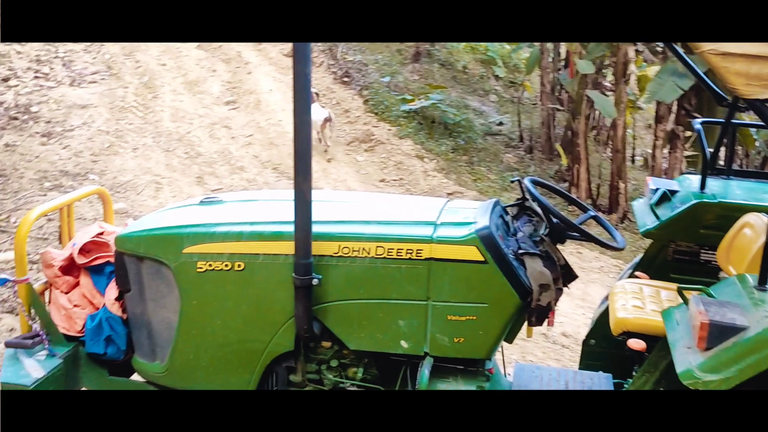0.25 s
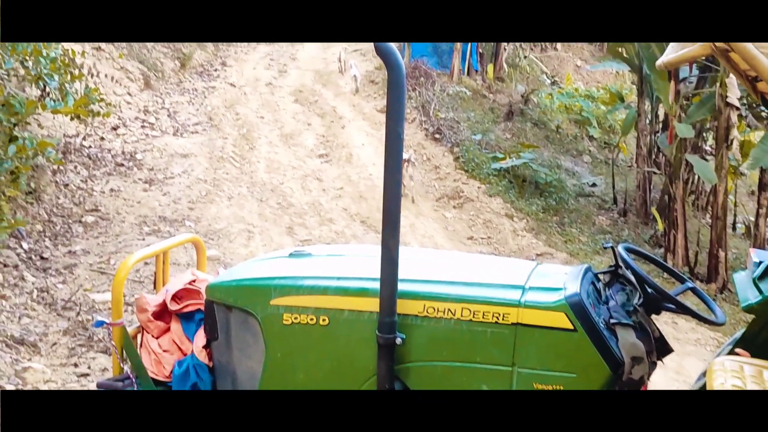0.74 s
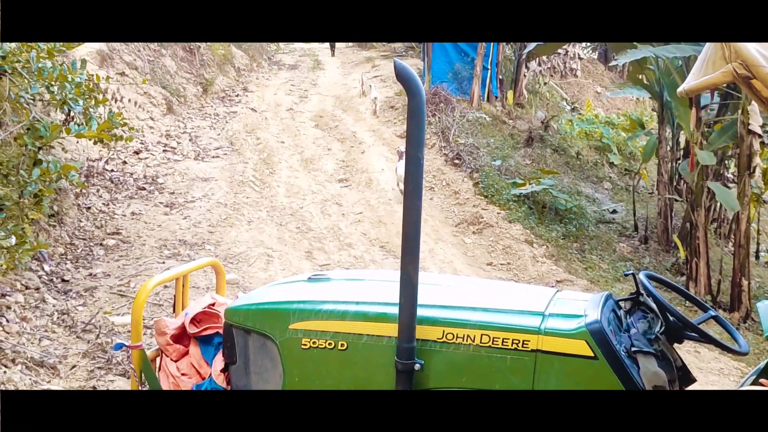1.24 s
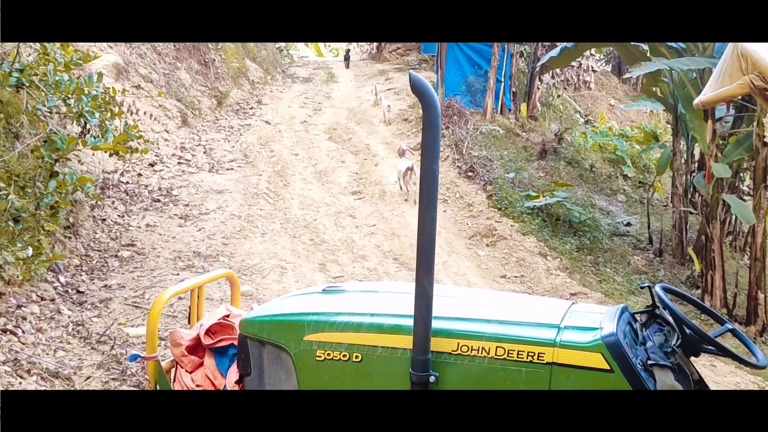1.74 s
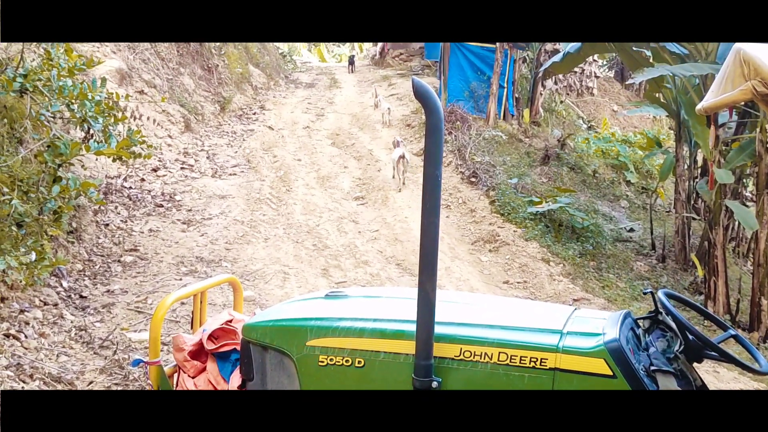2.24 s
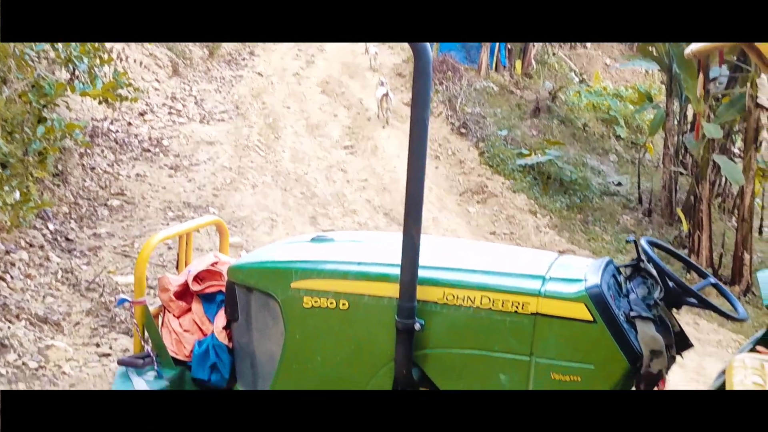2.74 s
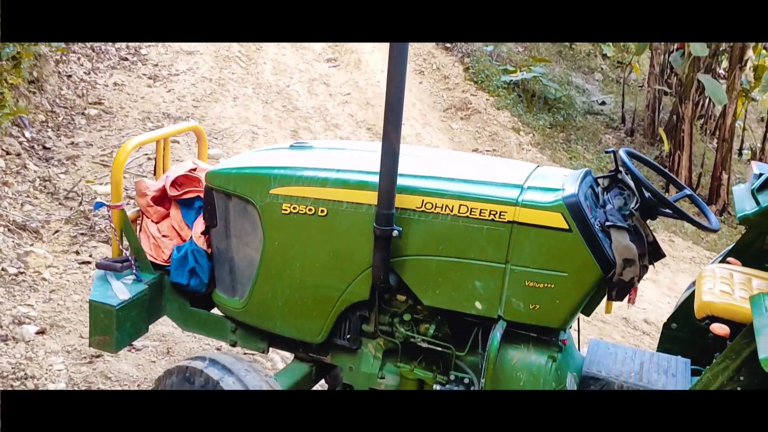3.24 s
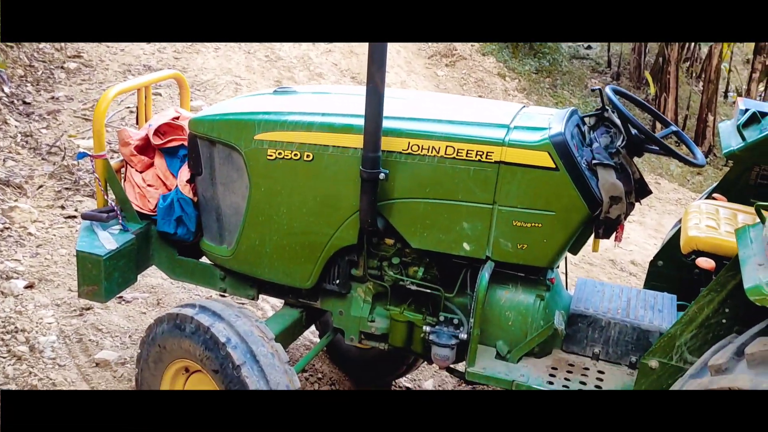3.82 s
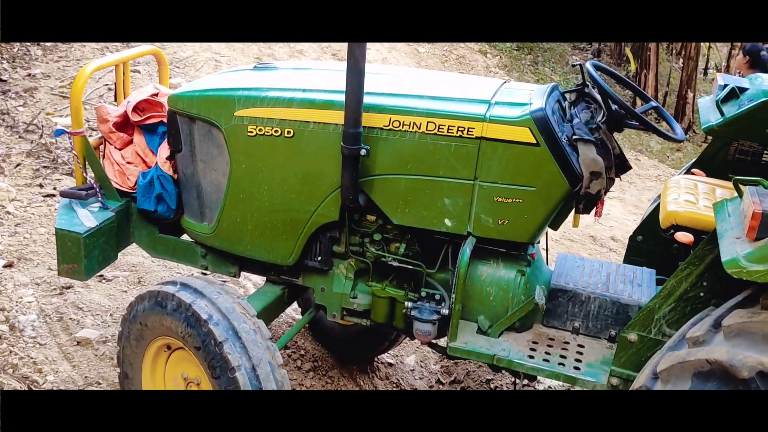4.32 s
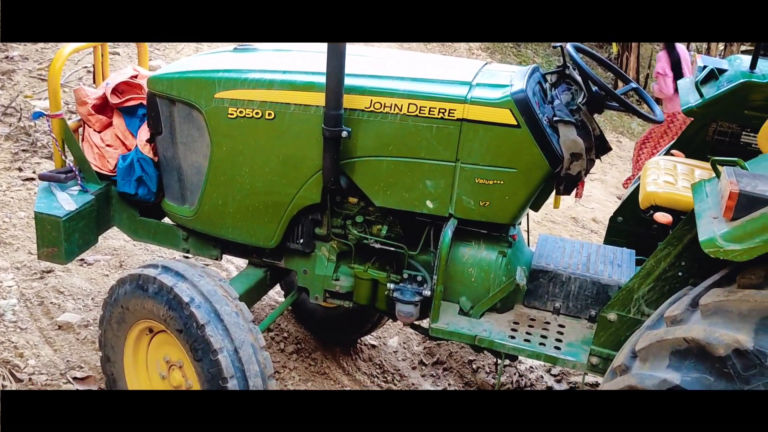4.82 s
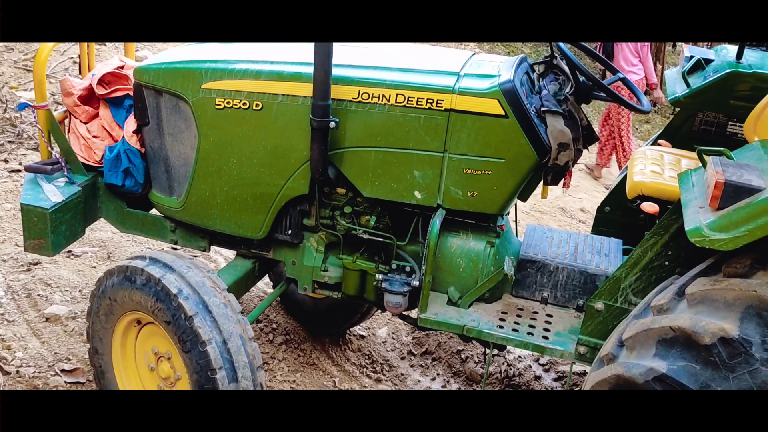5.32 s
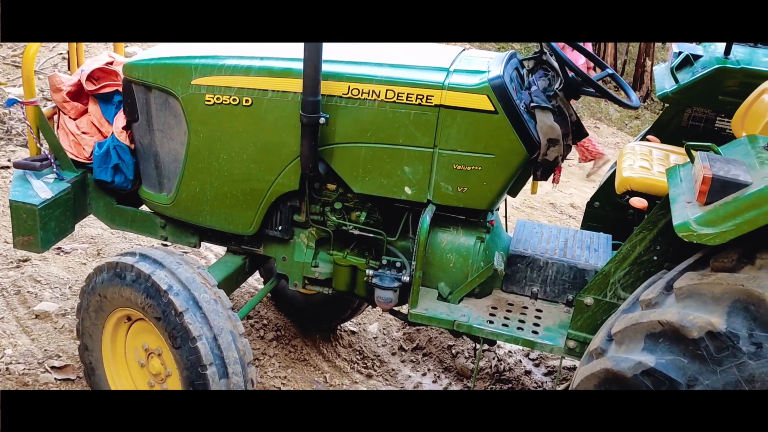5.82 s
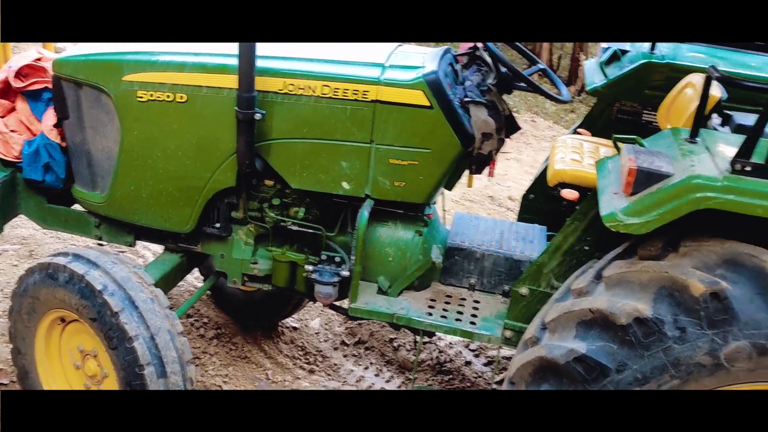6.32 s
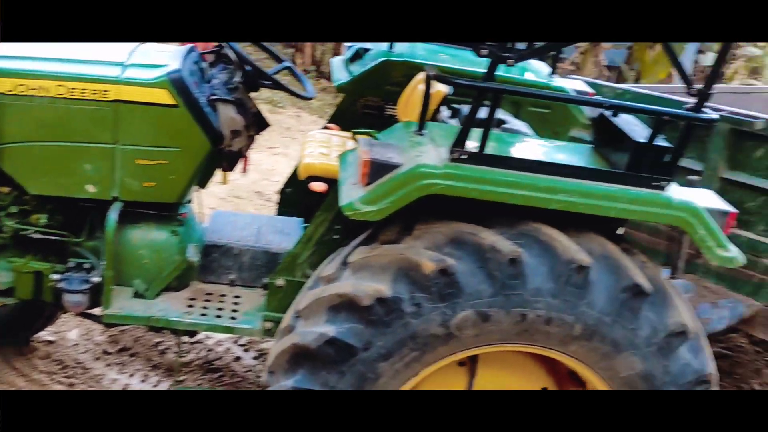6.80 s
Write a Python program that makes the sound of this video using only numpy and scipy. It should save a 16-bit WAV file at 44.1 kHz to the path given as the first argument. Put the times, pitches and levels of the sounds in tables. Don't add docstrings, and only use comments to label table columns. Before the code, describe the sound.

Dry outdoor stereo sound beside a dirt track, close shovelling mostly toward the right, over very faint far engines and leaves. From 0 to 0.7 seconds, steel blades meet gravel with bright clicks, sharp pebble knocks and a short crunch. Around 0.9 to 1.55, shovelfuls of soil land on a thin steel trailer bed: gritty splats, dull thuds and hollow, beating metallic rings, with soil rumbling across. At 1.6 a strong crunching thrust hits with a hard stone knock; at 2.25 a louder, hissing shove follows. Smaller scrapes fade by 2.9. From 3 to 4.5, faint trickling and light grit, with a finger thump at 3.5. Isolated clicks come at 4.6 and 4.9, a busier pebble clatter from 5.4 to 6.2, then finger taps on the phone case around 6.4 to 6.7. At 6.85 a blade crunches and scrapes sharply, biting again near 7.0.

```python
import sys
import numpy as np
from scipy import signal
from scipy.fft import rfft, irfft, next_fast_len
from scipy.io import wavfile
from scipy.ndimage import uniform_filter1d, map_coordinates

SR = 44100
rng = np.random.default_rng(int(sys.argv[2]) if len(sys.argv) > 2 else 0)


def generate_wav(signal):
    frames = np.transpose(np.atleast_2d(signal))
    scaled = np.clip(frames, -1, 1) * 32767
    pcm = np.round(scaled).astype(np.int16)
    wavfile.write(sys.argv[1], SR, pcm)


def boost(x):
    u = np.asarray(x, float) / 20
    return 10 ** u


N = 311346

# t/s, peak/dB, t60/s, grit fineness/dB
STABS = [(0.1664, -26, 0.27, 16), (0.373, -23, 0.095, 11), (0.539, -34, 0.17, -17), (0.545, -38, .15, -11),
         (0.6215, -41, 0.21, -3), (1.102, -25.5, 0.18, 11), (1.224, -35, 0.15, -32),
         (1.7286, -35.5, 0.15, -31), (2.1807, -34.5, 0.32, 17), (2.958, -44, 0.12, 10),
         (2.995, -51, 0.12, 7), (3.33, -48, .1, 5), (3.563, -51, 0.072, 5), (3.613, -50, 0.1, 8),
         (3.712, -45, .1, 11), (4.108, -46, 0.16, -6), (4.26, -50.5, 0.25, -10), (4.627, -34.5, 0.23, 3),
         (4.66, -45, 0.23, 3), (5.446, -37, 0.15, -4), (5.458, -30.5, 0.14, -8), (5.5566, -40.5, 0.24, -31),
         (5.64, -46, .1, -5), (5.655, -45, 0.089, -5), (5.67, -49, 0.091, -5), (5.697, -41, 0.043, 8),
         (5.692, -30.5, 0.037, 19), (5.722, -44.5, 0.52, -20), (5.771, -35, 0.17, 21),
         (5.874, -48.5, 0.49, 26), (6.041, -44.5, 0.45, 13), (6.1489, -52, 0.088, -2)]
# t/s, peak/dB, t60/s, grit fineness/dB, rise/s
SHOVES = [(0.0, -36, 0.21, -3.5, 0.045), (0.549, -27.5, 0.38, 4.5, 0.0075), (1.592, -15, 0.18, 7, 0.016),
          (1.62, -26, 0.52, -0.5, 0.0088), (2.242, -22.5, 0.25, 4, 0.017), (2.256, -16, 0.22, 4.5, 0.02),
          (2.281, -12.5, 0.15, 9, 0.024), (2.308, -27, 0.72, 2, 0.0057), (2.35, -30, .15, -9, 0.0081),
          (2.684, -33.5, 0.37, 6.5, 0.03), (2.715, -34, 0.17, -3, 0.011), (2.745, -42, 0.11, -25, 0.0071),
          (2.79, -36.5, 0.18, 2, 0.014), (2.82, -39, 0.054, 16, 0.0079), (3.289, -42.5, 0.24, 6, 0.012),
          (3.384, -40.5, 0.096, -12, 0.01), (3.87, -45, 0.16, 2, 0.018), (3.92, -43, 0.067, 2, 0.0082),
          (5.062, -40, 0.11, -6, 0.013), (5.606, -38, 0.53, 6, 0.029), (6.6, -54.5, 0.79, 6, 0.038),
          (6.705, -49, 0.25, 8, 0.016), (6.851, -17.5, 0.2, 8.5, 0.0034), (6.973, -29.5, 0.31, 4, 0.013),
          (6.992, -26, 0.098, 7, 0.0037)]
# t/s, level/dB
SLIDE = [(0.0, -77), (0.29, -57), (0.69, -61.5), (0.95, -55), (1.26, -57), (1.57, -63.5), (1.77, -74),
         (1.97, -56), (2.22, -70.5), (2.89, -68), (3.38, -64.5), (3.8, -66), (4.2, -80), (4.82, -66.5),
         (5.25, -81.5), (5.64, -67.5), (6.43, -70.5), (7.06, -80)]
# t/s, peak/dB, t60/s, grit share/dB
LOADS = [(0.924, -41, 0.14, 1), (1.048, -21.5, 0.17, -18), (1.057, -24, 0.15, -7), (1.071, -21, .2, -20),
         (1.083, -21, 0.31, -9.5), (1.1, -22, 0.18, -4), (1.118, -30.5, 0.38, -2), (1.14, -37.5, 0.38, -12),
         (1.223, -33.5, 0.24, -1.5), (1.319, -21.5, 0.22, -17), (1.346, -27, 0.52, -20),
         (1.426, -26, 0.51, -22.5)]
# f/Hz, level/dB
STONES = [(1200, -17.5), (2300, 1.5), (3150, -3), (4100, 2), (6800, 1.5), (8300, 7), (9300, -1.5),
          (11500, -22)]
CRUNCH = [(250, -22), (600, -3), (1100, 0), (1800, -4), (2600, -8), (4500, -22)]
HISS = [(7500, -1.5), (9700, 8.5), (11400, 0.5), (12400, 10), (13200, 8), (14100, 12.5), (14700, -5.5),
        (16000, -48)]
SOIL = [(250, -19.5), (600, 1.5), (1100, -1.5), (1600, -10), (2250, -14.5), (3100, -18.5), (4500, -23),
        (12000, -49)]
GRIT = [(1000, -9), (1850, -5), (2550, -9), (3100, -7), (4200, -10), (5500, -7), (9000, -18), (14000, -52)]
BLADE_HZ = [2265, 4020, 4660, 6520, 7230, 7650, 8310, 11650, 13800, 14140]
# level/dB, t60/s
BLADE = [(-3, 0.04), (10, 0.034), (3, 0.033), (3, .04), (-20, .06), (-13, 0.054), (-1.5, 0.063),
         (-1, 0.065), (-8, .05), (2, .05)]
STAB_RISE_S, STAB_CRUNCH_DB, STAB_HISS_DB = 0.00032, -12, -28
SHOVE_CRUNCH_DB, SHOVE_HISS_DB = -4, -12.5
SHOVE_LEVEL_DB = -2
CRUNCH_PER_FINE = -0.5
SLIDE_CRUNCH_DB, SLIDE_HISS_DB, CLOD_CRUNCH_DB = -1.5, -11, -22


def gravel():
    slide_mix_db = np.array([[0], [SLIDE_CRUNCH_DB], [SLIDE_HISS_DB], [-np.inf], [-np.inf]])
    power = (curve(SLIDE) * boost(slide_mix_db)) ** 2
    power[1] += (boost(CLOD_CRUNCH_DB) * soil_flow()) ** 2

    digs = [(*row, STAB_RISE_S, STAB_CRUNCH_DB, STAB_HISS_DB) for row in STABS]
    digs += [(s, db + SHOVE_LEVEL_DB, *row, SHOVE_CRUNCH_DB, SHOVE_HISS_DB) for s, db, *row in SHOVES]
    for s, db, t60, fine_db, rise, crunch_db, hiss_db in digs:
        i = int(s * SR)
        mix_db = np.array([[0], [crunch_db + CRUNCH_PER_FINE * fine_db], [hiss_db + fine_db]])
        spill = boost(db - 11.0 + mix_db) * burst(t60, rise)
        power[:3, i:i + SR // 2] += spill[:, :N - i] ** 2
    for s, db, t60, grit_db in LOADS:
        i = int(s * SR)
        spill = boost(db - 9.5 + np.array([[0], [grit_db]])) * burst(t60, STAB_RISE_S)
        power[3:, i:i + SR // 2] += spill ** 2

    stutter_db = 1.5 * walk(90) + 1.2 * np.array([walk(40) for _ in power])
    flow = np.sqrt(power) * boost(stutter_db)
    shared = grains(.1, 2.3)
    ports = []
    for _ in range(2):
        stones, crunch, hiss, soil, grit = flow * unit(shared + .85 * grains(.12, 1.8))
        blade = sum(boost(db) * ring(stones if hz < 10000 else hiss, hz, t60)
                    for hz, (db, t60) in zip(BLADE_HZ, BLADE))
        heap = colour(stones, STONES) + colour(crunch, CRUNCH) + colour(hiss, HISS)
        load = colour(soil, SOIL) + colour(grit, GRIT)
        ports.append(heap + load + boost(-40) * blade)
    return np.array(ports)


def burst(t60, rise):
    t = np.arange(SR // 2) / SR
    shape = (1 - np.exp(-t / rise)) * np.exp(-np.log(1000) * t / t60)
    return shape / shape.max()


# t/s, peak/dB
CHIPS = [(0.1713, -22), (0.3222, -26.5), (0.376, -22), (0.4223, -23), (0.6762, -39), (4.6285, -42),
         (4.831, -39), (4.879, -39), (4.918, -46), (5.4151, -33), (5.56, -51), (5.7244, -31), (5.7744, -40),
         (5.787, -29), (5.912, -42), (5.956, -34.5), (6.0408, -28), (6.149, -33.5)]
PEBBLES = [(0.1713, -12), (0.3222, -31), (0.376, -19), (0.455, -34), (0.5382, -17), (0.6218, -22),
           (0.6762, -18), (0.8744, -30.5), (2.8283, -51), (4.6285, -25.5), (5.4465, -50), (5.4595, -24.5),
           (5.56, -30.5), (5.693, -36), (5.7244, -25), (5.7744, -28), (5.8755, -34.5), (5.956, -46),
           (6.149, -43), (5.6, -36), (5.615, -34), (5.632, -34), (5.668, -35), (5.698, -30), (6.0403, -63),
           (6.0744, -34.5)]
LUMPS = [(0.546, -17), (0.9279, -30.5), (1.049, -22), (1.058, -20), (1.102, -16), (1.2252, -30),
         (1.595, -40), (1.6053, -11), (2.255, -34), (2.2608, -36), (2.2806, -38), (2.3, -24.5),
         (6.858, -34), (6.985, -32), (5.5958, -25), (5.599, -23), (5.6067, -21.5), (5.646, -31),
         (5.654, -36), (5.741, -38), (6.162, -42.5), (6.219, -44), (6.419, -45)]
# f/Hz, length/cycles
STONE_SIZES = [
    (10100, 0.67),
    (5770, 0.79),
    (2860, 0.44),
]
TICK_BODY_HZ, TICK_BODY_T60_S, TICK_BODY_DB = 2400, 0.0076, -34


def ticks():
    out = np.zeros(N + SR)
    t = np.arange(SR // 100) / SR
    rows = [(*row, *size) for kind, size in zip((CHIPS, PEBBLES, LUMPS), STONE_SIZES) for row in kind]
    for s, db, hz, cycles in rows:
        i = int(s * SR)
        train = boost(-21) * rng.standard_normal(len(t)) * np.exp(-t / 0.003)
        train[0] = 1
        out[i:i + len(t)] += boost(db + 6.0) * np.convolve(blip(t, hz, cycles), train)[:len(t)]
    out += boost(TICK_BODY_DB) * ring(out, TICK_BODY_HZ, TICK_BODY_T60_S)
    return colour(out[:N], [(200, -23), (1200, -7.0), (16000, -4.5)], keep=True)


# t/s, level/dB
DRAG = [
    (6.85, -68),
    (6.862, -36.5),
    (6.9, -46),
    (6.965, -46.5),
    (6.985, -42),
    (7.005, -39),
    (7.025, -58),
    (7.06, -57),
]
EDGE_HZ = [1160, 1640, 2120, 2310, 2510, 2790, 3010, 4120]
# level/dB, t60/s
EDGE = [(-1, 0.073), (4, 0.076), (-9, .1), (-7.5, 0.077), (-8.5, 0.22), (3, 0.021), (7, 0.016), (3, .04)]


def drag():
    slips = curve(DRAG)[0] * grains(.03, 2)
    return boost(-27.0) * sum(boost(db) * ring(slips, hz, t60) for hz, (db, t60) in zip(EDGE_HZ, EDGE))


# t/s, peak/dB, thud f/Hz, bed share/dB, thud
# decay/s
SLAMS = [(1.048, -23, 520, -14.5, 0.0013), (1.063, -27.5, 465, -14.5, 0.0055),
         (1.227, -30.5, 380, -5.5, 0.0035), (1.319, -15, 380, -9.5, 0.0075), (1.355, -22, 389, -12, 0.0089),
         (1.427, -25.5, 386, -1.5, 0.0058), (1.445, -25, 405, -28, 0.0043),
         (1.478, -25.5, 395, -15.5, 0.0052), (1.385, -31.5, 388, -13, 0.0067), (1.51, -30, 392, -9, 0.0043),
         (1.54, -35, 387, -6, 0.0034)]
# t/s, peak/dB, thud f/Hz, bed share/dB
KNOCKS = [(0.545, -48.5, 380, -1), (0.924, -34.5, 658, -9), (1.009, -48, 272, -19),
          (1.049, -44.5, 120, -21), (1.097, -37, 315, 3), (1.108, -39, 256, -25), (1.172, -35, 258, -12),
          (1.19, -39, 300, -12), (1.235, -38.5, 144, -17), (1.259, -38, 325, -21), (1.6, -36, 208, 2.5),
          (1.638, -33.5, 376, -32), (2.273, -36.5, 735, -2.5), (2.312, -28.5, 295, -6.5),
          (2.349, -36.5, 318, -6), (2.733, -48.5, 364, -4), (3.231, -48, 240, -3.5), (3.57, -55, 218, -26),
          (3.692, -48, 313, -10), (4.252, -50, 114, -9.5), (5.071, -52, 613, -18.5),
          (5.598, -54, 203, -5.5), (5.636, -46.5, 178, -28), (6.216, -48, 578, -6.5),
          (6.219, -46.5, 810, -11), (6.861, -38.5, 625, -11), (6.868, -45, 216, -10)]
# f/Hz, level/dB, t60/s
BED = [(132, -16.5, 0.13), (215, -10, 0.14), (270, -6, 0.19), (300, -4, 0.18), (367.6, -5, 0.31),
       (396, -6, 0.33), (429, -11.5, 0.39), (471.6, -4, 0.32), (520, 1, 0.13), (607, -2, 0.21),
       (648, 5.5, 0.079), (727, 5, 0.11), (780, -3.5, 0.39), (871, -5, 0.18)]
KNOCK_DECAY_S, PUSH_S = .0036, 0.0011


def trailer():
    thuds, pushes = np.zeros(N + SR), np.zeros((len(BED), N + SR))
    t = np.arange(SR // 8) / SR
    force = np.hanning(int(PUSH_S * SR) + 2)
    force /= force.sum()
    for s, db, hz, bed_db, decay in SLAMS + [(*row, KNOCK_DECAY_S) for row in KNOCKS]:
        i, age = int(s * SR), t / decay
        spot_db = 1.2 * rng.standard_normal(len(BED))
        thuds[i:i + len(t)] += boost(db + 3.0) * np.sin(2 * np.pi * hz * t) * age * np.exp(1 - age)
        pushes[:, i:i + len(force)] += boost(db + bed_db + spot_db)[:, None] * force
    clods = soil_flow() * grains(0.055, 3.9)
    bed = sum((-1) ** k * boost(db) * ring(pushes[k, :N] + boost(-39.5) * clods, hz, t60)
              for k, (hz, db, t60) in enumerate(BED))
    rumble = boost(-12) * colour(clods, [(80, -22), (220, 0), (420, -2), (900, -14), (2500, -32)])
    return colour(thuds[:N] + bed + rumble, [(40, -44.0), (110, 2), (220, 2.0), (16000, -7.0)], keep=True)


# t/s, level/dB
RUMBLE = [
    (0.85, -85),
    (0.978, -44),
    (1.246, -42.5),
    (1.5, -39),
    (1.656, -38),
    (1.724, -78),
    (1.9, -50),
]
# middle t/s, length/s, level/dB
TRICKLES = [
    (2.4, 1, -62),
    (3.673, 1.33, -52),
    (5.474, 0.18, -55.5),
    (7.05, 0.2, -69),
]


def soil_flow():
    t = np.arange(N) / SR
    swells = (boost(db) * np.cos(np.pi * np.clip((t - s) / length, -.5, .5)) for s, length, db in TRICKLES)
    return curve(RUMBLE)[0] + sum(swells)


# t/s, click level/dB, click f/Hz, thump level/dB, thump f/Hz
FINGERS = [
    (3.467, -40.5, 1500, -30.5, 270),
    (4.859, -56, 890, -36.5, 374),
    (4.872, -38, 1160, -36.5, 364),
    (6.42, -41, 2130, -43, 200),
    (6.559, -64, 700, -38.5, 300),
    (6.568, -33, 1210, -34, 181),
    (6.707, -43, 690, -37, 122),
    (7, -73, 600, -25.5, 215),
]


def fingers():
    out = np.zeros(N + SR)
    t = np.arange(SR // 20) / SR
    for s, click_db, click_hz, thump_db, thump_hz in FINGERS:
        i = int(s * SR)
        click = boost(click_db) * blip(t, click_hz, 1.0)
        thump = boost(thump_db) * blip(t, thump_hz, 0.51)
        out[i:i + len(t)] -= click + thump
    return out[:N] * boost(np.array([[0], [-14]]))


def echoes(x, t60, db):
    t = np.arange(SR // 3) / SR
    tail = rng.standard_normal(len(t)) * np.exp(-np.log(1000) * t / t60) * (1 - np.exp(-t / 0.015))
    return boost(db) * signal.oaconvolve(x, tail / np.sqrt(np.sum(tail ** 2)))[:N]


# f/Hz, level/dB per Hz
VALLEY = [(15, -47), (25, -10.5), (96, -0.5), (276, -3.5), (955, -14.5), (2150, -20), (3050, -28),
          (6660, -31.5), (7220, -35), (8050, -33), (11100, -42.5), (12100, -30.5), (14200, -38.5),
          (15800, -33)]
# t/s, level/dB
DRONE = [(0.0, -65.5), (0.6, -62), (0.98, -68.5), (1.26, -62), (2.12, -68), (2.46, -65), (3.01, -68.5),
         (3.7, -63), (4.66, -66), (6.19, -64.5), (6.75, -70.5), (6.95, -62.5), (7.06, -73)]
VALLEY_DB = -55.5


def valley():
    swell, drone = walk(0.053), unit(curve(DRONE)[0])
    size = next_fast_len(N)
    freqs = np.fft.rfftfreq(size, 1 / SR)
    hz, db = np.transpose(VALLEY)
    noise = rfft(rng.standard_normal((2, size))) * boost(np.interp(np.log(freqs + 1), np.log(hz), db))
    octave = np.log2(freqs + 1e-9)
    out = 0
    for centre in 30 * 2 ** np.arange(0, 9.3, .5):
        band = np.exp(-((octave - np.log2(centre)) / .35) ** 2)
        mid, side = irfft(noise * band, size)[:, :N]
        apart = np.clip(centre / 660.0, .45, 1)
        level = boost(0.3 * swell + 2.2 * walk(7)) * (drone if centre < 180 else 1)
        out = out + level * (mid + apart * side * np.array([[1], [-1]]))
    return unit(out) * boost(VALLEY_DB)


def unit(x):
    return x / np.sqrt(np.mean(x ** 2))


def colour(x, points, keep=False):
    hz, db = np.transpose(points)
    log_gain = np.interp(np.log(np.fft.rfftfreq(2048, 1 / SR) + 1), np.log(hz), db) * np.log(10) / 20
    cepstrum = irfft(log_gain)
    cepstrum[1:1024] *= 2
    cepstrum[1025:] = 0
    response = irfft(np.exp(rfft(cepstrum)))
    if not keep:
        response = response / np.sqrt(np.sum(response ** 2))
    return signal.oaconvolve(x, response)[:N]


def ring(x, hz, t60):
    pole = np.exp(2j * np.pi * hz / SR - np.log(1000) / (t60 * SR))
    return signal.lfilter([0, pole.imag], [1, -2 * pole.real, abs(pole) ** 2], x)


def blip(t, hz, cycles):
    age = 2 * hz * t / cycles
    return np.sin(2 * np.pi * hz * t) * age * np.exp(1 - age)


def walk(rate):
    k = int(SR / rate)
    steps = np.repeat(rng.standard_normal(N // k + 1), k)
    return 1.2 * uniform_filter1d(uniform_filter1d(steps, k), k)[:N]


def grains(share, spread_db):
    when, size, sign = rng.random(N), rng.exponential(size=N), rng.standard_normal(N)
    return unit((when < share) * boost(spread_db * np.minimum(size, 5)) * sign)


def curve(table):
    s, *columns = np.transpose(table)
    t = np.arange(N) / SR
    return np.array([boost(np.interp(t, s, c, left=-120, right=-120)) for c in columns])


# t/s, delay/samples
PORT_LAGS = [
    (0, 16),
    (0.75, 19),
    (1.5, 19.6),
    (4.3, 19.6),
    (5.2, 19),
    (5.8, 17),
    (6.4, 17),
    (6.8, 15),
]


def scene():
    stones, steel = gravel() + ticks() + drag(), trailer()
    ports = np.array([x + echoes(x, .25, -15) + steel + echoes(steel, .1, -10) for x in stones])
    late = np.interp(np.arange(N) / SR, *np.transpose(PORT_LAGS))
    ports[0] = map_coordinates(ports[0], [np.arange(N) - late], order=4)
    return boost(-1.0) * ports + valley() + fingers()


# f/Hz, level/dB
SHADE = [(100, -0.5), (400, .5), (750, -4), (1300, 0), (2300, 6), (3600, -3.5), (6000, -7.5), (7100, -11.5),
         (8800, -44), (10900, -7), (12500, -3.5), (15000, 1.5)]
# f/Hz, level/dB
PHONE = [(20, -16), (50, -6), (90, 0), (15300, 0), (15700, -10), (16100, -50)]


def phone(dry):
    ports = [colour(dry[0], SHADE, keep=True), dry[1]]
    return np.array([colour(x, PHONE, keep=True) for x in ports])


def roll_off(x):
    return signal.sosfilt(signal.butter(12, 16000, fs=SR, output="sos"), x)


def record(dry):
    mix = phone(dry)
    return roll_off(mix)


dry = scene()
out = record(dry)
generate_wav(out)
```